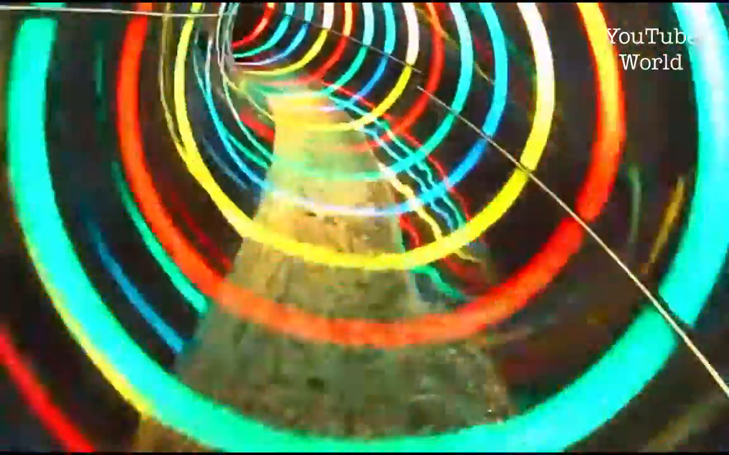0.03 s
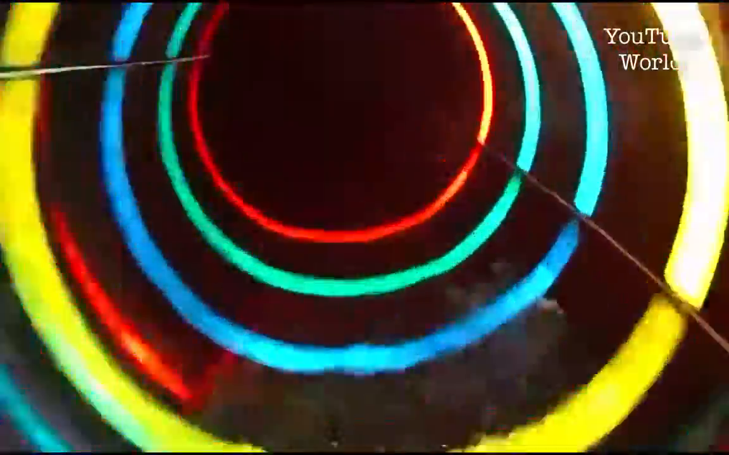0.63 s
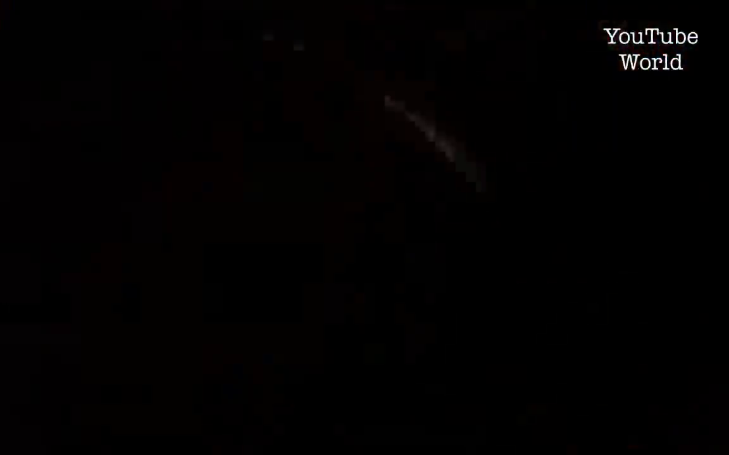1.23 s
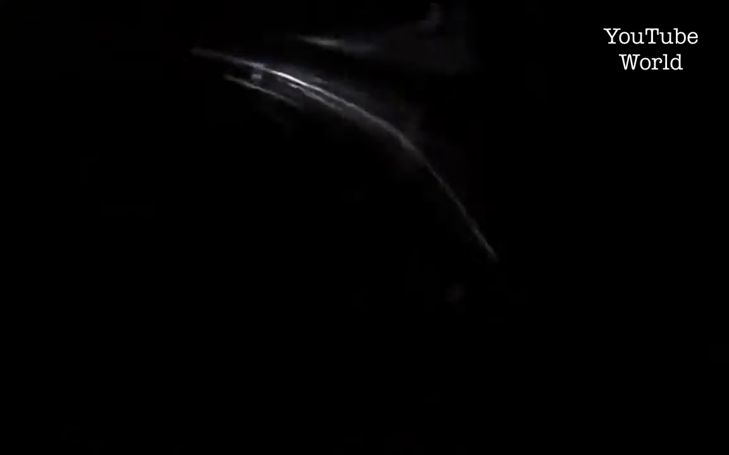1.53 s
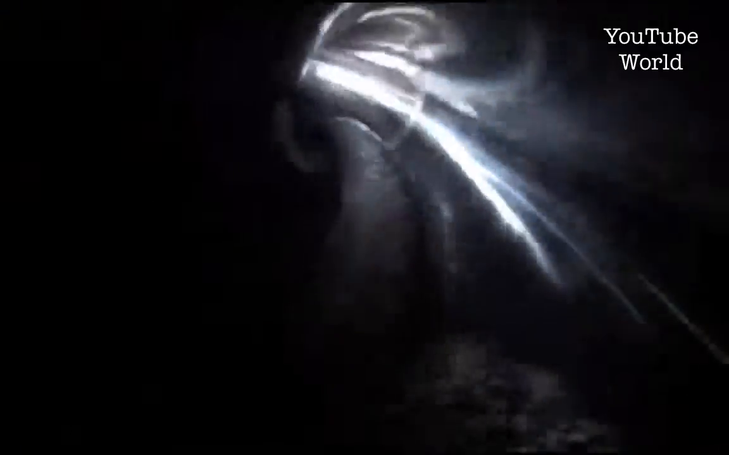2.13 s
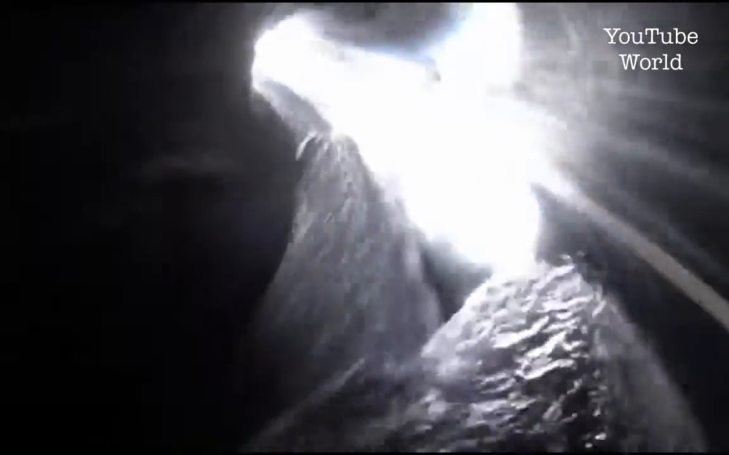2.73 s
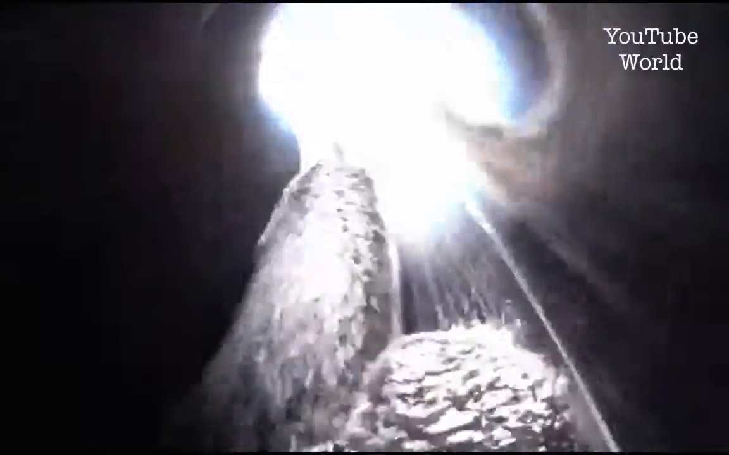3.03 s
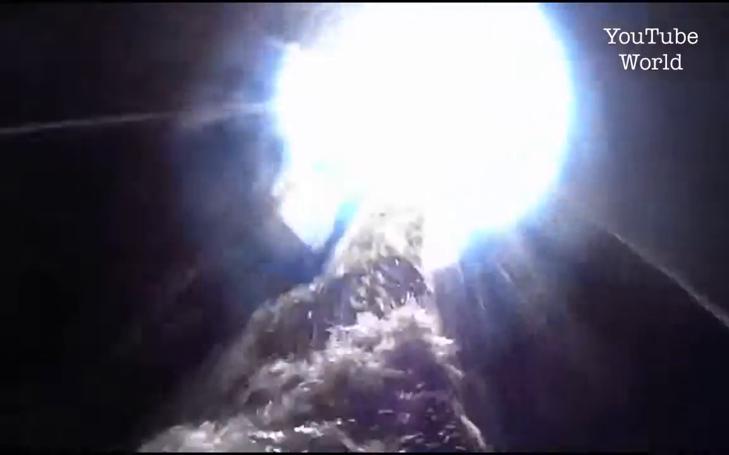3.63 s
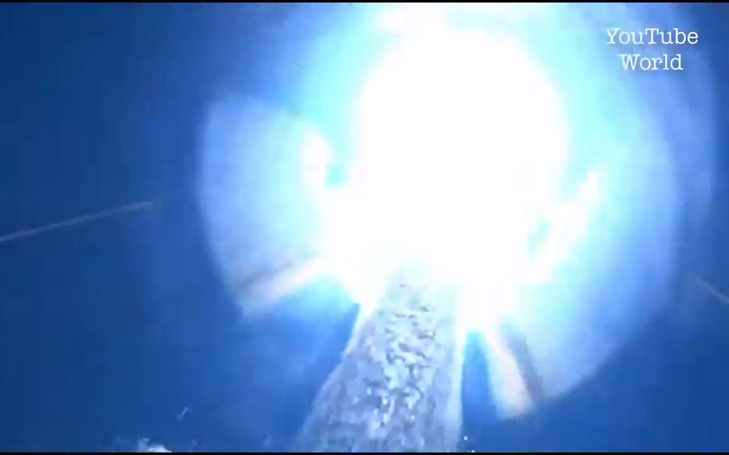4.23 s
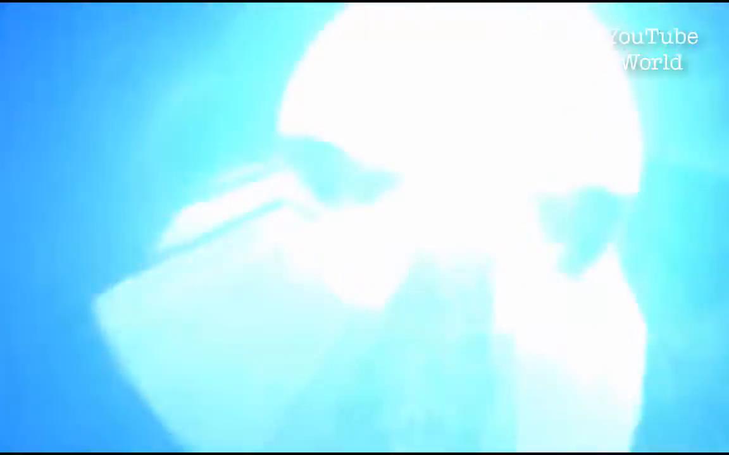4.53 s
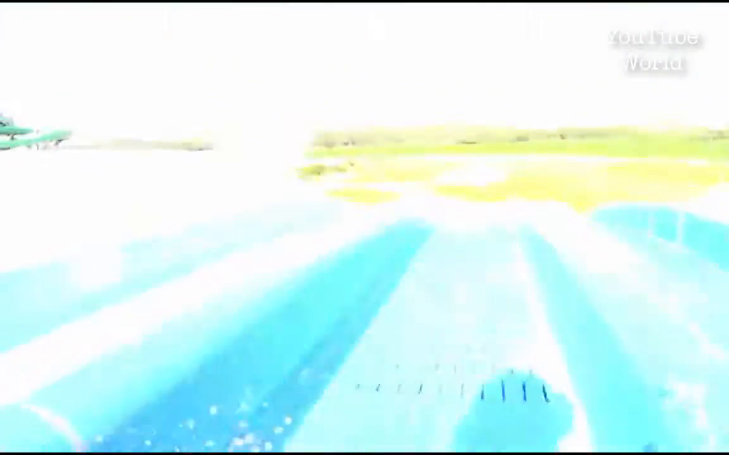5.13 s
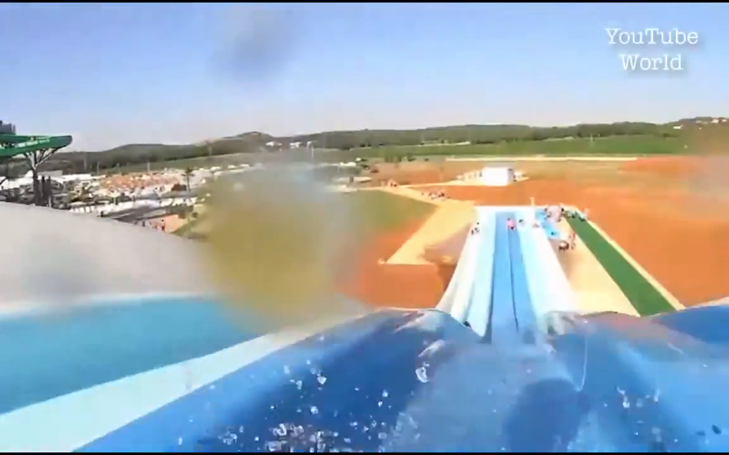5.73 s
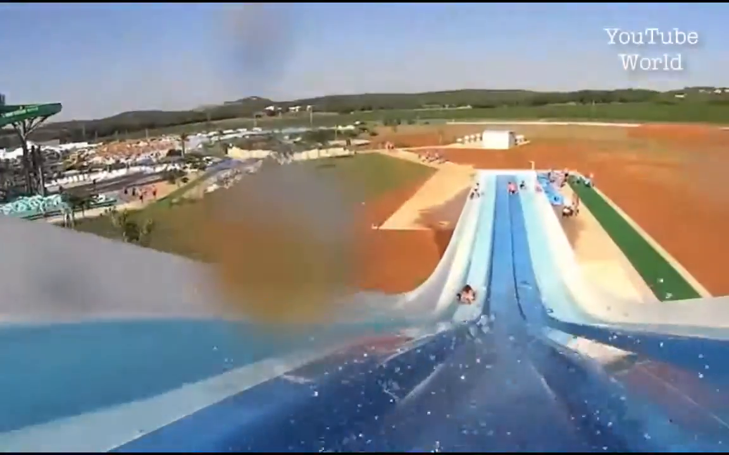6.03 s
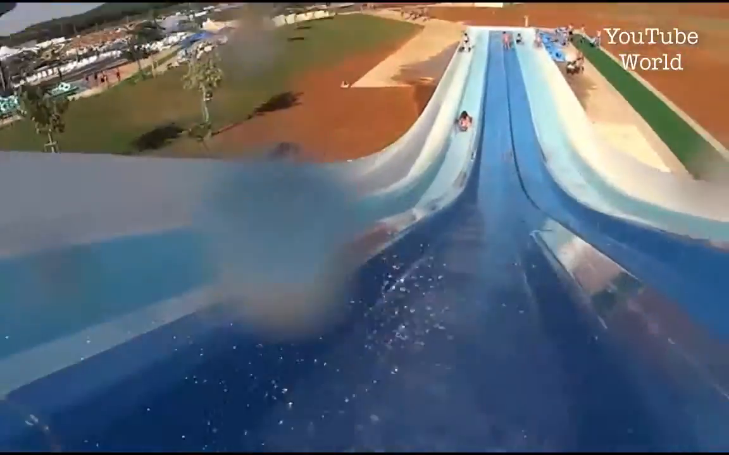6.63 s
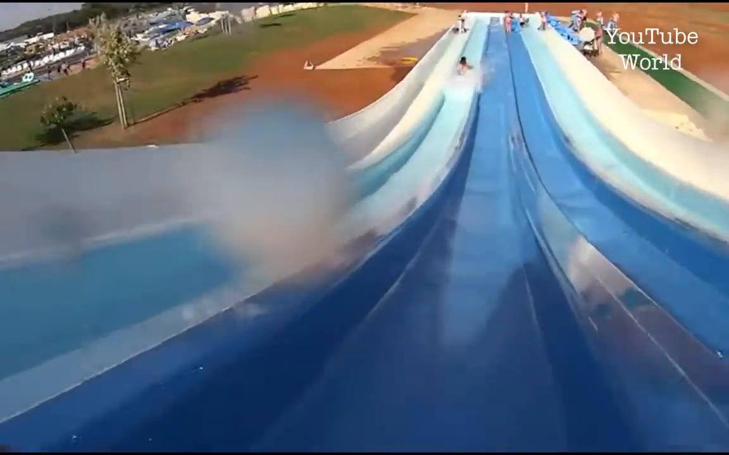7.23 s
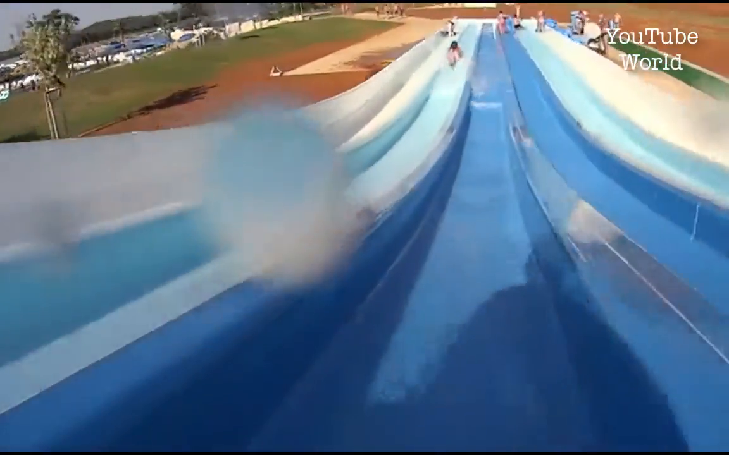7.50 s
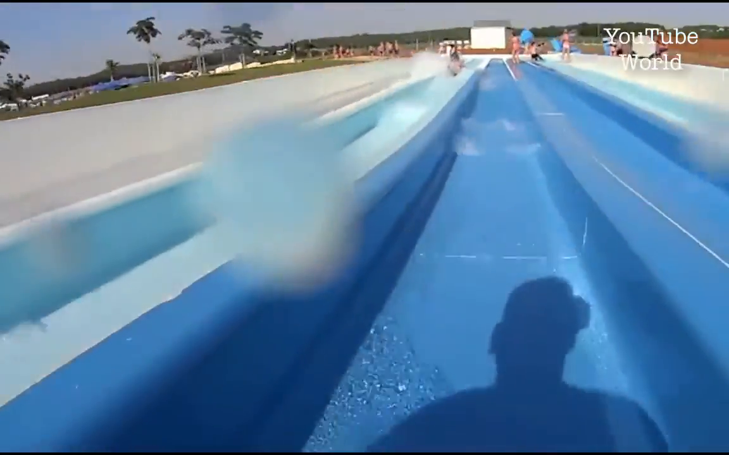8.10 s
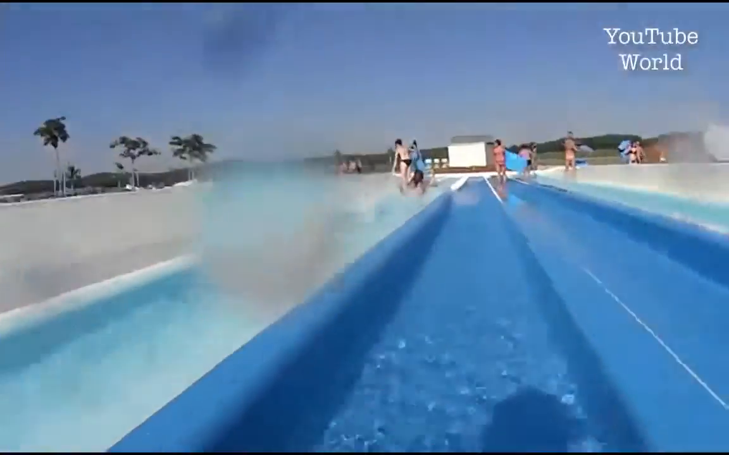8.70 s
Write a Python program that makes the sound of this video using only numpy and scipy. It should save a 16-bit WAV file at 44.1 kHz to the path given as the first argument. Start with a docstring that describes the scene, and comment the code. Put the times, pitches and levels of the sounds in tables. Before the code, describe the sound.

Water rushes and hisses as a rider speeds down a tube slide onto an open lane, with spray pattering and wind buffeting the microphone.

```python
"""Water rushes and churns inside a hollow tube as a rider speeds down a slide and out onto an open lane.
The water is turbulent noise that grows with the flow; gushes slap the slide and spray patters on the
rider's waterproof camera case. Wind buffets the case, knocks set the tube booming and bumps thud on
the lane. The resonances of the case colour it all on the way to two microphone ports.
One large drop cracks on the case and makes the limiter duck for a moment."""
import sys
import numpy as np
from scipy import signal
from scipy.fft import rfft, irfft, next_fast_len
from scipy.io import wavfile
from scipy.ndimage import uniform_filter1d, minimum_filter1d

SR = 44100
rng = np.random.default_rng(int(sys.argv[2]) if len(sys.argv) > 2 else 0)


def wrap_up_sound(samples):
    """Save the sound to the file named by the first command line argument, as 16-bit audio."""
    columns = np.atleast_2d(samples).T
    # keep every value between -1 and 1, then stretch to whole-number steps
    tamed = np.clip(columns, -1, 1)
    steps = np.round(tamed * 32767).astype(np.int16)
    wavfile.write(sys.argv[1], SR, steps)


N = 390726
TIME = np.arange(N) / SR
FFT_SIZE = next_fast_len(N, real=True)
FREQ_HZ = np.fft.rfftfreq(FFT_SIZE, 1 / SR)
FRAME, HOP = 1024, 256  # samples


def amp(db):
    """Amplitude ratio of a level in decibels."""
    return 10 ** (np.asarray(db) / 20)


def unit(x):
    """Normalisation to rms 1."""
    return x / np.sqrt(np.mean(x ** 2) + 1e-20)


def spectrum_db(points):
    """Spectral envelope: levels interpolated on a logarithmic frequency axis."""
    hz, db = np.transpose(points)
    return np.interp(np.log(FREQ_HZ + 1), np.log(hz + 1), db)


def swell(middle_s, half_width_s):
    """Gaussian envelope: a smooth rise to 1 and fall."""
    return np.exp(-((TIME - middle_s) / half_width_s) ** 2)


def impacts(rows, rise_s, decay_s):
    """Damped response: a quick rise and an exponential decay for each (start_s, level_db)."""
    envelope = np.zeros(N)
    for start_s, db in rows:
        age = np.maximum(TIME - start_s, 0)
        envelope += amp(db) * (1 - np.exp(-age / rise_s)) * np.exp(-age / decay_s)
    return envelope


def wander(low_hz, high_hz):
    """Random modulation: slow band-pass noise of rms 1."""
    band = FREQ_HZ ** 2 / (FREQ_HZ ** 2 + low_hz ** 2) / (1 + (FREQ_HZ / high_hz) ** 2)
    return unit(irfft(rfft(rng.standard_normal(FFT_SIZE)) * band, FFT_SIZE)[:N])


def eddies(patchy_db, patch_hz=700, patch_s=.07):
    """Turbulence: two noises in which patches of time and frequency swell and fade."""
    framing = dict(nperseg=FRAME, noverlap=FRAME - HOP)
    spectra = signal.stft(rng.standard_normal((2, N)), **framing)[2]
    patches = rng.standard_normal(spectra.shape[1:])
    patches = uniform_filter1d(patches, max(1, round(patch_hz * FRAME / SR)), axis=0)
    patches = unit(uniform_filter1d(patches, max(1, round(patch_s * SR / HOP)), axis=1))
    return unit(signal.istft(spectra * amp(patchy_db * patches), **framing)[1][:, :N])


def droplets(per_s, spread_db):
    """Shot noise: two Poisson trains of tiny impacts of random size."""
    sizes = amp(spread_db * np.minimum(rng.exponential(1, (2, N)), 4))
    signs = rng.choice([-1, 1], (2, N))
    hits = rng.random((2, N)) < per_s / SR
    return unit(sizes * signs * hits)


def in_tube(exit_s=4.87, fade_s=0.065):
    """Degree of enclosure: 1 inside the tube, falling to 0 past its mouth."""
    return .5 - .5 * np.tanh((TIME - exit_s) / fade_s)


# Flow past the rider, relative to the fastest stretch: time_s, flow_db
FLOW = [(0, -9.5), (0.45, -10), (0.79, -7), (0.98, -8), (1.5, -7.5), (1.9, -5.5), (2.46, -5.5),
        (2.66, -2.5), (2.92, -2), (3.25, -5), (3.78, -0.6), (4.65, -0.8), (4.92, -3.4), (5.06, -1.5),
        (5.22, -3), (5.68, -1), (6.45, -6.5), (6.88, -4.5), (7.28, -6), (7.8, 0.0), (8.86, 0)]
def flow_level_db(full_db, slope, lane_db):
    """Power law: the level gains `slope` dB per dB of flow, and lane_db more in the open."""
    flow_db = np.interp(TIME, *np.transpose(FLOW))
    return full_db + slope * flow_db + lane_db * (1 - in_tube())


def resonances(modes):
    """Resonance and antiresonance: the gain of a set of bell-shaped peaks and notches."""
    return amp(sum(db * np.exp(-.5 * ((FREQ_HZ - hz) / width) ** 2) for hz, width, db in modes))


# Case resonances, tube cross modes, interference of the lane's reflection: centre_hz, width_hz, gain_db
CASE_MODES = [(1060, 49, 2.5), (1218, 63, 6), (1460, 150, 5.5), (2200, 105, -4), (2312, 57, 3.5),
              (2594, 140, 3.5), (2840, 93, -2.5), (3730, 160, -1), (4480, 170, 0.5), (10460, 610, 3.5)]
TUBE_MODES = [(247, 19, 1.5), (345, 33, -3.5), (400, 22, 0.5), (466, 27, -5), (560, 40, 0.5), (688, 23, 3),
              (800, 49, -2), (904, 19, 1.5), (1095, 54, -1.5), (1440, 97, 1), (2650, 160, -1),
              (4130, 70, 2)]
LANE_INTERFERENCE = [(670, 78, 0.5), (1190, 20, 0), (2004, 130, -3.5), (2660, 200, 1), (4630, 67, -1),
                     (5280, 110, -1.5)]
# Likeness of the two ports in each space: frequency_hz, coherence_ratio, left_lead_rad
TUBE_PORTS = [(30, .92, 0), (250, .8, -.4), (430, .5, -1.6), (620, .83, -.5), (850, .76, -.1),
              (1150, .87, -.35), (1400, .87, .2), (1650, .8, -.2), (1850, .3, -1), (2100, .25, -3),
              (2300, .4, -.5), (2550, .72, -.3), (2900, .28, -.2), (3500, .15, .2), (3850, .45, 3),
              (4600, .15, 2), (5500, .33, 2.3), (6500, .17, .3), (7200, .47, -1.25), (11000, .67, -.35)]
LANE_PORTS = [(30, .86, 0), (220, .6, -.5), (420, .42, -1.9), (620, .68, -.7), (850, .66, 0),
              (1150, .88, -.3), (1400, .84, .1), (1700, .78, -.35), (2050, .15, -1.6), (2350, .8, -.45),
              (2700, .82, -.5), (3450, .2, -.5), (3850, .56, 3), (4500, .38, 6.2), (4850, .3, 6.6),
              (5300, .25, 8.2), (6200, .22, 8.3), (7200, .5, 11.35), (11000, .69, 12.2)]
# Unequal sensitivity of the ports: frequency_hz, left_minus_right_db
PORT_BALANCE = [(30, -1), (120, 0), (260, -1), (420, -1.5), (600, -2.5), (780, -7.5), (950, -1.5),
                (1220, -6), (1480, -1.2), (1900, -4.5), (2400, -0.5), (3600, -1.8), (4800, 0.5),
                (11000, .9)]
def transfer_paths():
    """Transfer functions of tube and lane: (share over time, coherence, left response, right response)."""
    balance = amp(spectrum_db(PORT_BALANCE) / 2)
    spaces = (in_tube(), TUBE_MODES, TUBE_PORTS), (1 - in_tube(), LANE_INTERFERENCE, LANE_PORTS)
    paths = []
    for share, modes, ports in spaces:
        hz, coherence, lead_rad = np.transpose(ports)
        gain = resonances(CASE_MODES) * resonances(modes)
        lag = np.exp(-1j * np.interp(FREQ_HZ, hz, lead_rad))
        paths.append((share, np.interp(FREQ_HZ, hz, coherence), gain * balance, gain / balance * lag))
    return paths


def through_case(noises, spectrum, paths):
    """Linear filtering: two noises are coloured and reach the ports partly coherent, at rms 1."""
    common, separate = rfft(noises, FFT_SIZE) * amp(spectrum_db(spectrum))
    out = np.zeros((2, N))
    for share, coherence, left, right in paths:
        blend = coherence * common + np.sqrt(1 - coherence ** 2) * separate
        out += share * irfft(np.array([common * left, blend * right]), FFT_SIZE)[:, :N]
    return unit(out)


# Spectra of the wind's slow buffeting and of its roar: frequency_hz, density_db
BUFFET_SPECTRUM = [(5, -6), (16, 0.5), (28, 4.5), (48, -4), (70, -12.5), (130, -29), (500, -63)]
ROAR_SPECTRUM = [(25, -11), (65, -0.5), (125, 1), (200, -2.5), (320, -6.5), (700, -25), (2500, -60)]
# Gusts on the open lane: middle_s, half_width_s, level_db
GUSTS = [(5.12, 0.097, -37), (5.67, .05, -37), (7.38, 0.27, -35.5), (7.949, 0.35, -33.5), (8.74, 0.2, -30)]
# Single jolts of the rider that thump the case: middle_s, level_db
JOLTS = [(0.25, -44), (0.76, -34.5), (1.63, -40), (1.87, -39), (2.48, -34), (2.85, -36), (3.28, -38),
         (3.61, -34), (4.89, -33.5), (5.075, -28), (5.4, -40), (7.2, -36), (8.67, -28)]
def wind(paths):
    """Turbulent pressure on the case: a steady draught, gusts and jolts add in power."""
    gusts = sum(amp(db) * swell(s, width) for s, width, db in GUSTS)
    jolts = sum(amp(db) * swell(s, half_width_s=0.05) for s, db in JOLTS)
    draught = amp(flow_level_db(full_db=-47, slope=0.05, lane_db=1))
    pressure = np.sqrt(draught ** 2 + (gusts * amp(-6)) ** 2 + jolts ** 2)
    buffet = through_case(rng.standard_normal((2, N)), BUFFET_SPECTRUM, paths) * pressure
    buffet *= amp(1.6 * wander(low_hz=5, high_hz=6))
    steady_roar = amp(flow_level_db(full_db=-48.5, slope=0.54, lane_db=1))
    roar_gain = np.hypot(steady_roar, gusts) * amp(1.7 * wander(low_hz=5, high_hz=13))
    roar = through_case(eddies(patchy_db=0.5, patch_hz=90), ROAR_SPECTRUM, paths) * roar_gain
    return buffet + roar


# Knocks of the rider on the tube wall: start_s, level_db
KNOCKS = [(0.02, -36), (1.22, -37), (3.15, -38.5), (3.42, -38)]
# The tube's hollow boom: frequency_hz, density_db
BOOM_SPECTRUM = [(120, -40), (195, -27), (222, 8), (258, 1), (295, -2.5), (420, -40)]
def tube_knocks(paths):
    """Impact excitation: each knock sets the tube's lowest resonance booming."""
    boom = through_case(rng.standard_normal((2, N)), BOOM_SPECTRUM, paths)
    return boom * impacts(KNOCKS, rise_s=0.018, decay_s=0.15)


# Bumps of the rider over the lane: start_s, level_db
BUMPS = [(4.885, -24), (5.054, -18), (5.135, -19), (7.245, -23), (8.679, -17), (8.754, -9)]
def lane_bumps(paths):
    """Heavily damped impacts: each gives a dull thud and sloshes the water."""
    thud = through_case(rng.standard_normal((2, N)), ROAR_SPECTRUM, paths) * amp(-4.5)
    slosh = through_case(rng.standard_normal((2, N)), CHURN_SPECTRUM, paths) * amp(-6)
    return (thud + slosh) * impacts(BUMPS, rise_s=0.0035, decay_s=0.014)


# Large drops on the case: start_s, level_db, pitch_hz, decay_s, splash_ratio
DROPS = [(5.2636, 1.5, 10000, .0005, .8), (6.047, -11.5, 1800, .0016, .3)]
def large_drops():
    """Damped oscillation: each drop rings briefly right on the case, with a splash of noise."""
    out = np.zeros((2, N))
    for start_s, db, hz, decay_s, splash in DROPS:
        ring = np.sin(2 * np.pi * hz * (TIME - start_s)) + splash * rng.standard_normal((2, N))
        out += ring * impacts([(start_s, db)], rise_s=.0001, decay_s=decay_s)
    return out


# Gushes that slap the slide: start_s, level_db, decay_s, relative_hiss_db
SLAPS = [(0.725, -23.5, .04, -5), (0.785, -26.5, .04, -6), (1.295, -20.5, 0.024, -10),
         (2.595, -23, 0.027, -12), (4.843, -20, 0.014, -7), (4.998, -20, .016, 5), (5.12, -21, 0.016, -5),
         (5.342, -18, 0.032, -7), (5.66, -26, 0.075, 4), (6.118, -15.5, 0.033, -10),
         (6.575, -16.5, 0.027, -12), (7.785, -24, 0.067, 5), (8.168, -13, .02, -10), (8.51, -31, 0.045, 12)]
def slaps(paths, rise_s=0.0052):
    """Transient turbulence: each gush bursts and decays, with a gurgling body and its own share of hiss."""
    body_gain = sum(impacts([(s, db)], rise_s, decay_s) for s, db, decay_s, _ in SLAPS)
    top_gain = sum(impacts([(s, db + hiss_db)], rise_s, decay_s) for s, db, decay_s, hiss_db in SLAPS)
    body = through_case(eddies(patchy_db=1.5), RUSH_SPECTRUM, paths)
    top = through_case(eddies(patchy_db=6.5), HISS_SPECTRUM, paths)
    return body * body_gain + top * top_gain


# Spray striking the case: frequency_hz, density_db
SPRAY_SPECTRUM = [(2000, -16), (4500, 2), (6000, 1.5), (7500, -1), (9000, 1.5), (11000, -2)]
def spray(paths, flutter, shower_db):
    """Shot noise over turbulence: droplets patter brightly on the case, louder in a shower."""
    patter = unit(eddies(patchy_db=1.85, patch_hz=300) + .5 * droplets(per_s=2600, spread_db=3))
    level_db = flow_level_db(full_db=-25, slope=1.24, lane_db=0.2) + shower_db
    level_db += 0.3 * flutter + 0.74 * wander(low_hz=4.7, high_hz=11)
    return through_case(patter, SPRAY_SPECTRUM, paths) * amp(level_db)


# Water churning under the rider: frequency_hz, density_db
CHURN_SPECTRUM = [(60, -25), (150, -8), (260, -2), (450, 3), (750, -3.5), (1100, -14.5), (2000, -17.5),
                  (5000, -47)]
# The rider ploughs into deeper water: middle_s, half_width_s, boost_db
PLOUGHS = [(1.27, .2, 3), (3.35, 0.33, 2), (7.4, .2, 0.5), (8.8, 0.22, 4.5)]
def churn(paths, flutter, shower_db):
    """Low-frequency turbulence: louder in deep water, weaker when water leaves the slide as spray."""
    plough_db = sum(db * swell(s, width) for s, width, db in PLOUGHS)
    level_db = flow_level_db(full_db=-32.5, slope=1.09, lane_db=3.06) + plough_db - 0.32 * shower_db
    level_db += flutter + 1.2 * wander(low_hz=8.5, high_hz=13)
    return through_case(eddies(patchy_db=2, patch_hz=200), CHURN_SPECTRUM, paths) * amp(level_db)


# The water's hiss: frequency_hz, density_db
HISS_SPECTRUM = [(1200, -17), (1900, -11.5), (2400, 0), (3200, 0), (4500, 0), (5900, -1), (6800, -10),
                 (8000, -15.5), (11000, -29)]
def hiss(paths, flutter):
    """High-frequency turbulence, with a fine grain of droplet impacts."""
    fizz = unit(eddies(patchy_db=2, patch_hz=250) + 0.34 * droplets(per_s=2500, spread_db=-2))
    level_db = flow_level_db(full_db=-22, slope=1.034, lane_db=0.1)
    level_db += .5 * flutter + 0.9 * wander(low_hz=5.5, high_hz=12)
    return through_case(fizz, HISS_SPECTRUM, paths) * amp(level_db)


# Water rushing past the rider: frequency_hz, density_db
RUSH_SPECTRUM = [(200, -27.5), (600, -14), (900, -2.5), (1200, 0), (1650, -3), (2000, -4.5), (2600, -6),
                 (3300, -13.5), (4500, -13), (9000, -52)]
def rush(paths, flutter):
    """Mid-frequency turbulence, its amplitude nearly proportional to the flow."""
    level_db = flow_level_db(full_db=-20.5, slope=0.99, lane_db=0.28) + 1.2 * flutter
    return through_case(eddies(patchy_db=1.54, patch_hz=170), RUSH_SPECTRUM, paths) * amp(level_db)


def wall_echo(direct, spread_s, echo_db, sets=4):
    """Scattering: the slide walls return close echoes, in sets that fade in and out as the rider moves."""
    age = np.arange(FRAME) / SR
    echo = np.zeros((2, N))
    for _ in range(sets):
        taps = rng.standard_normal(FRAME) * (age / spread_s) * np.exp(-age / spread_s)
        scattered = signal.oaconvolve(direct, taps[None] / np.linalg.norm(taps), axes=1)[:, :N]
        fade_hz = rng.uniform(0.2834, 1.109)
        echo += scattered * np.cos(2 * np.pi * (TIME * fade_hz + rng.random())) * np.sqrt(2 / sets)
    return (direct + amp(echo_db) * echo) / np.hypot(1, amp(echo_db))


# Showers of spray thrown up at the case: middle_s, half_width_s, boost_db
SHOWERS = [(2.85, 0.29, 0.5), (5.1, 0.18, 2.0), (6.83, 0.35, 10), (7.42, 0.083, 5)]
# Brief dips in the water's level: middle_s, dip_db
LULLS = [(4.965, 4), (6.08, 2.5), (6.72, 1.5), (7.97, 3), (8.105, 3.5), (8.615, 2)]
def water(paths):
    """Common modulation: the sheet of water breaks up unevenly, so one flutter shakes all four bands."""
    shower_db = sum(db * swell(s, width) for s, width, db in SHOWERS)
    lull_db = sum(db * swell(s, half_width_s=0.021) for s, db in LULLS)
    flutter = wander(low_hz=11.5, high_hz=11.4) * (1 - 0.34 * in_tube())  # the tube's echoes even it out
    stream = churn(paths, flutter, shower_db) + rush(paths, flutter)
    stream += hiss(paths, flutter) + spray(paths, flutter, shower_db)
    return wall_echo(stream * amp(-lull_db) + slaps(paths), spread_s=0.0041, echo_db=-12)


def scene():
    """Superposition of all the sources at the two ports."""
    paths = transfer_paths()
    return water(paths) + wind(paths) + lane_bumps(paths) + tube_knocks(paths) + large_drops()


def record(dry, ceiling_db=-5.5, hold_s=0.026, recover_db_per_s=280, cutoff_hz=11100):
    """Peak limiting: the gain ducks at once, holds and recovers; a low-pass then limits the band."""
    peak_db = 20 * np.log10(abs(dry).max(axis=0) + 1e-9)
    over_db = np.maximum(peak_db - ceiling_db, 0)
    hold = 2 * round(hold_s * SR / 2) + 1
    held_db = -minimum_filter1d(-over_db, hold, origin=hold // 2 - 18)  # looks 18 samples ahead
    recovery_db = TIME * recover_db_per_s
    released_db = np.maximum.accumulate(held_db + recovery_db) - recovery_db
    duck_db = uniform_filter1d(released_db, size=60)
    low_pass = signal.firwin(801, cutoff_hz, window=("kaiser", 8), fs=SR)
    return signal.oaconvolve(dry * amp(-duck_db), low_pass[None], "same", axes=1)


dry = scene()
out = record(dry)
wrap_up_sound(out)
```